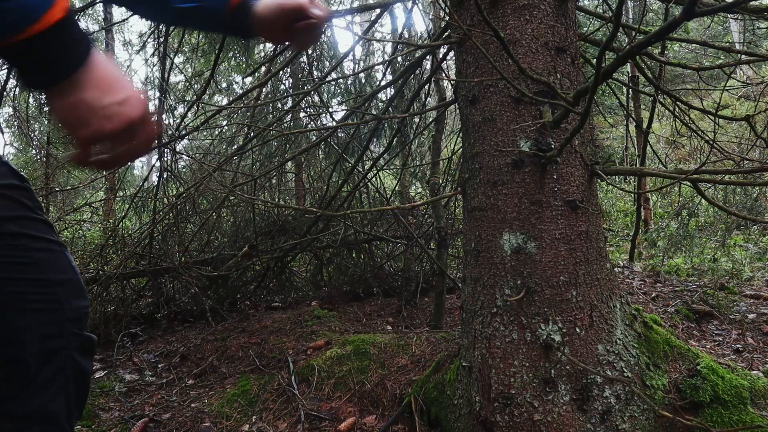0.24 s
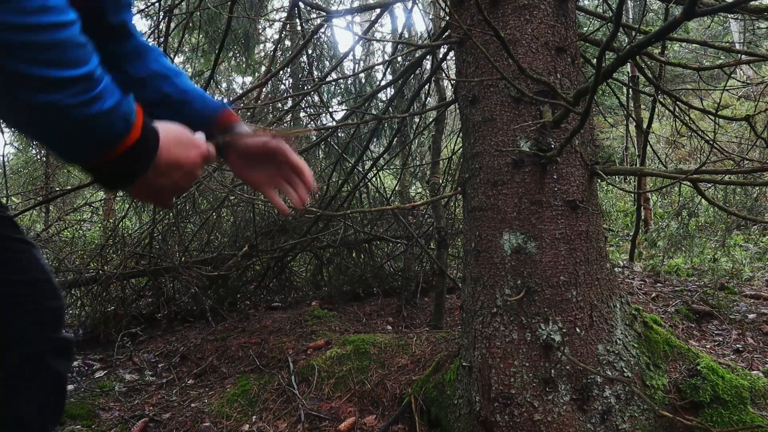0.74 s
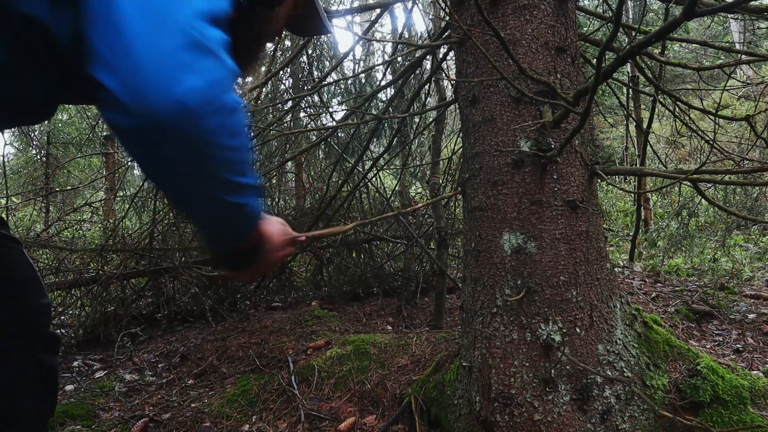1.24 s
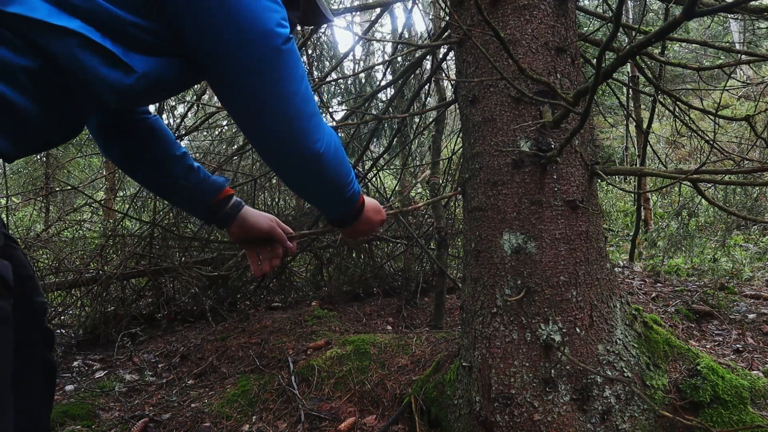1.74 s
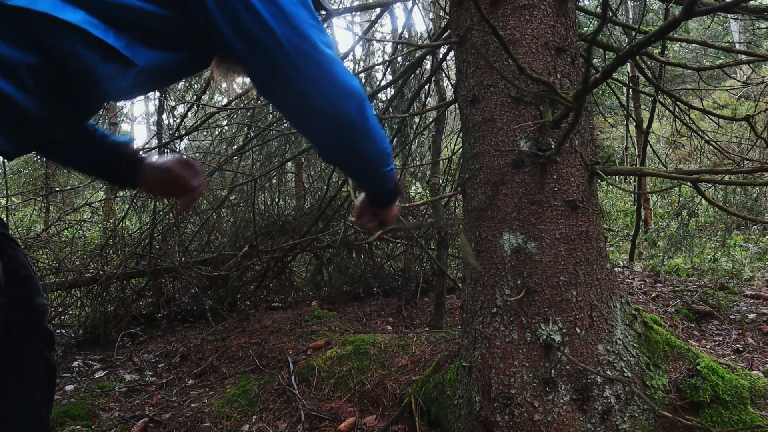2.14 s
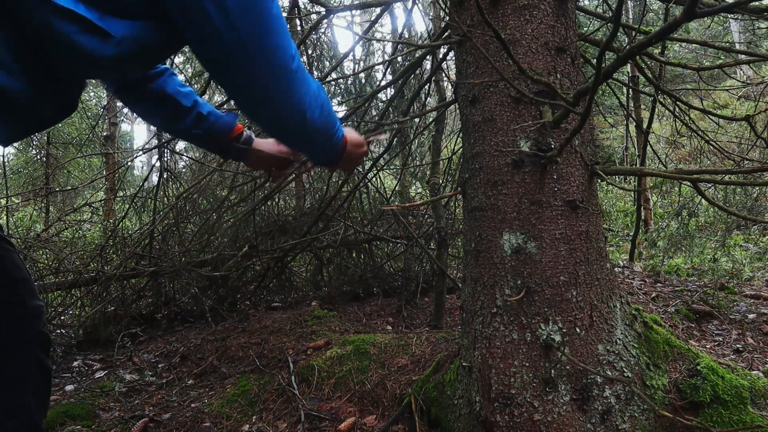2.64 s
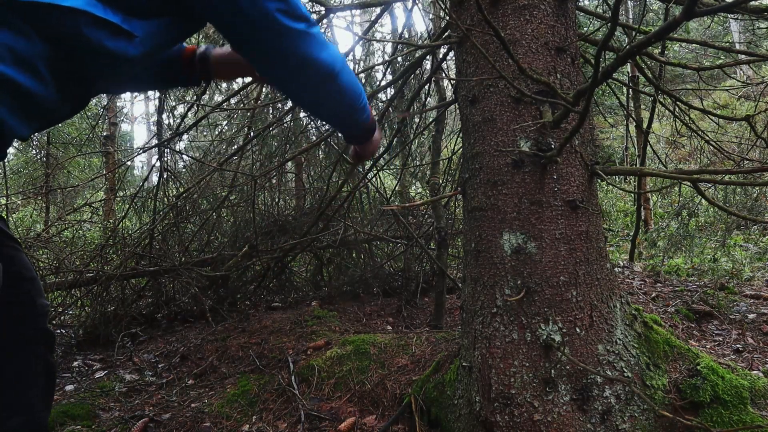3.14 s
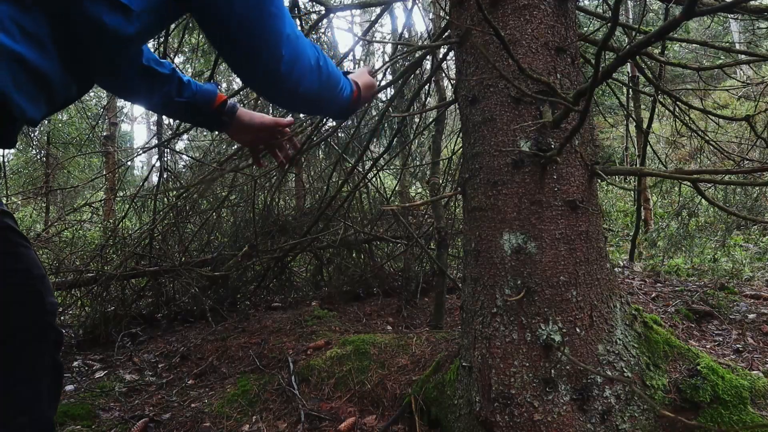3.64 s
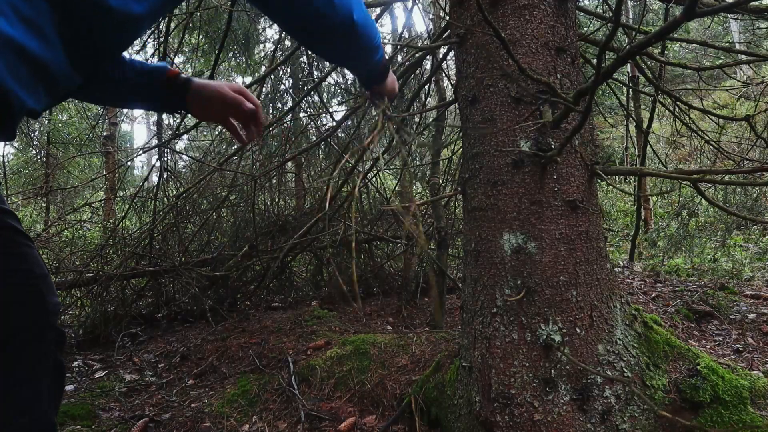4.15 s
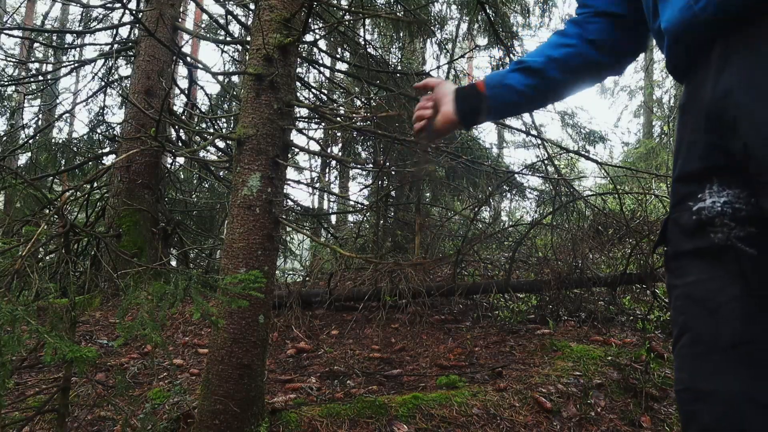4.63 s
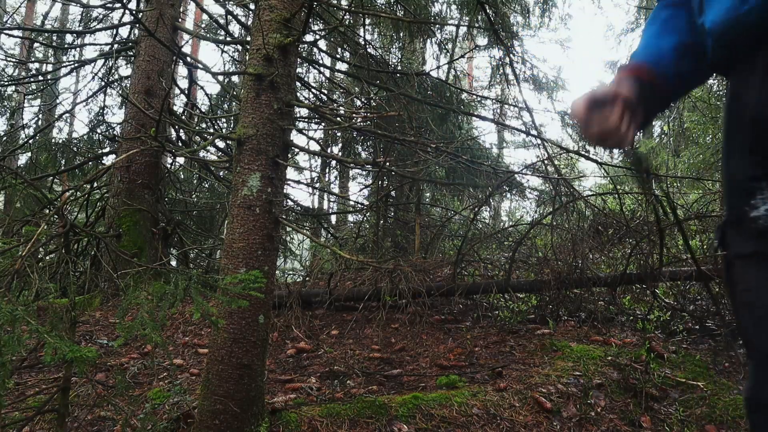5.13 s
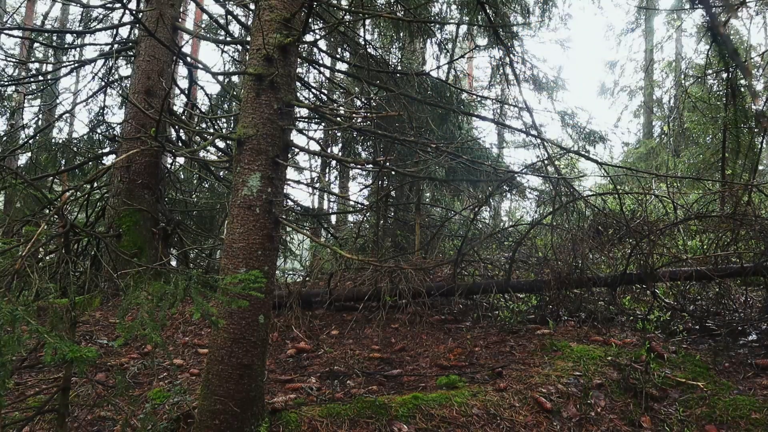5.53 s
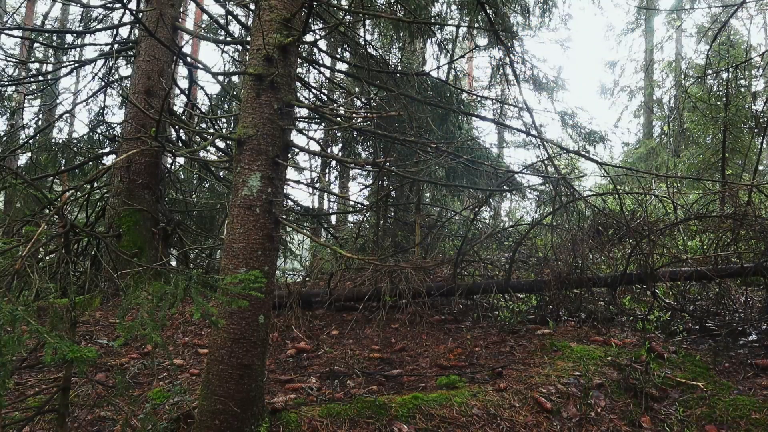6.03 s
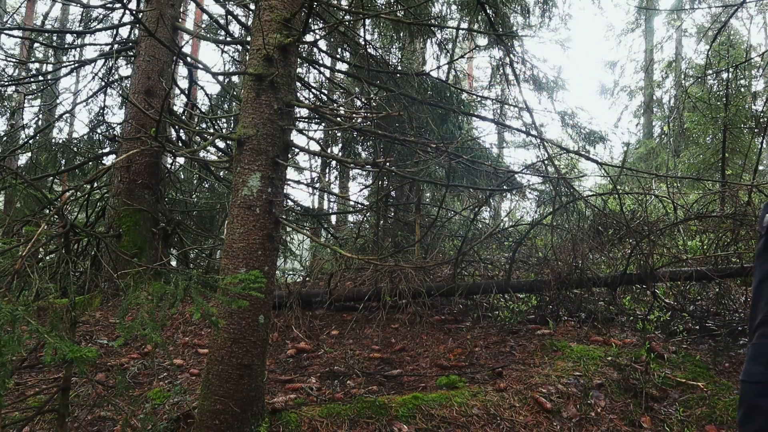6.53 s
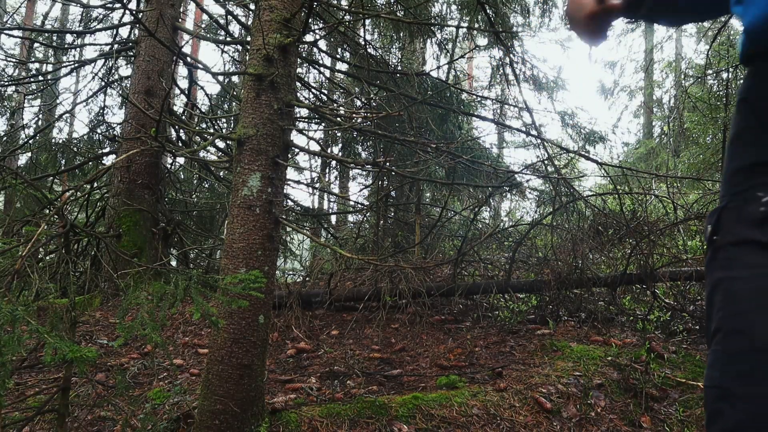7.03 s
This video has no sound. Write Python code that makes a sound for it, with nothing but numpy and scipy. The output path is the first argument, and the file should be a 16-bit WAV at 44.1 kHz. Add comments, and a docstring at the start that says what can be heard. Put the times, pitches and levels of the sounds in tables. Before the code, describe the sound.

A quiet forest with soft steady hush and low air rumble, heard by a close mono microphone. Immediately, at 0.04 s, a dry twig snaps brightly, then tiny ticks and light jacket rustle follow. At about 2.04 s two snaps land almost together, with small splinters after. From 2.35 to 4.3 s a songbird whistles short bending notes, faint, with fainter birds deeper among the trees. A hollow woody crack knocks at 3.2 s, a smaller snap at 4.0, and a strong, full break at 4.3. From 4.5 s the rustle thickens: cloth swishes near 5.0 to 5.5, and litter crunches in uneven strides. A duller crunch comes at 6.26, a heavy low thud with a crack at 6.63, more thuds around 6.85, then a very sharp, loud snap at 6.96. Rustle and small crackles continue to the end, about 7.3 s, with short echoes off trunks.

```python
"""A dry twig snaps at once in a quiet forest; more breaks follow, then steps over needle litter.
Breaks are bursts of fibre noise that ring the twig; small twigs crackle as filtered bursts, boots thud as
damped sines. Cloth swishes as resonant noise; jacket and litter rustle as coloured, grainy noise.
A songbird whistles bending sines, fainter birds sound deeper in the trees, over air rumble and hush.
Sparse decaying echoes scatter wood and birds between the trunks to a mono microphone."""
import sys
import numpy as np
from scipy import signal
from scipy.fft import rfft, irfft
from scipy.io import wavfile
from scipy.ndimage import uniform_filter1d

SR = 44100
rng = np.random.default_rng(int(sys.argv[2]) if len(sys.argv) > 2 else 0)


def digitize_waveform(pressure):
    """Quantize a signal to 16-bit integers and store it at the path in sys.argv[1].

    Rows of a 2-D input are taken as channels; values are limited to [-1, 1].
    """
    field = np.atleast_2d(pressure).T
    bounded = np.clip(field, -1, 1)
    quanta = np.round(bounded * 32767).astype(np.int16)
    wavfile.write(sys.argv[1], SR, quanta)


N = 321048

# breaking twigs: start_s, ring_hz, ring_gain_db, body_db, knock_db, crack_db, splinter_db
TWIG_BREAKS = [(0.044, 3930, 18, -41.5, -27.5, -19.5, -25.5), (2.0349, 1730, 17, -38.5, -21, -24, -26),
               (2.0436, 3530, 18, -32.5, -27, -18.5, -24.5), (2.108, 2850, 4, -48.5, -42.5, -42.5, -64),
               (2.1492, 3340, 4, -48.5, -43, -40, -43.5), (2.1863, 3330, 4.2, -45.5, -43.5, -42, -46.5),
               (3.199, 3070, 4.8, -44, -19.5, -20.5, -27.5), (3.3108, 2970, 2.7, -61, -40, -37.5, -40.5),
               (3.8663, 3940, 4.5, -73, -43.5, -34, -35), (4.012, 3520, 2.8, -48, -32.5, -24.5, -31.5),
               (4.286, 8200, 4, -45.5, -39, -36, -25), (4.3008, 2350, 10, -34, -16, -16, -18.5),
               (4.3079, 4930, 4, -32.5, -34, -28, -26), (4.5656, 2520, 4.9, -40.5, -34.5, -31.5, -34),
               (4.62, 1700, 2.7, -38, -33, -40.5, -48.5), (5.3456, 915, 8, -34.5, -33.5, -44.5, -66),
               (5.4456, 950, 5.9, -31, -31.5, -41, -53), (5.4712, 990, 2.1, -44, -30.5, -41, -50),
               (6.2584, 990, 1.4, -28, -19.5, -27, -26.5), (6.4312, 1760, 2.9, -36, -32, -42, -46),
               (6.626, 6450, 3.3, -31, -42, -39.5, -36.5), (6.6479, 3420, 13, -38, -25, -26, -23.5),
               (6.746, 4550, 4, -39, -35.5, -38, -36), (6.824, 980, 11, -31, -27, -35.5, -46),
               (6.937, 6450, 2.5, -56, -54, -43.5, -41.5), (6.9566, 3020, 1.4, -42, -25.5, -14.5, -15),
               (6.9697, 3900, 4, -43, -35, -26.5, -25.5)]
# bands of body, knock, crack and splinter: low_hz, high_hz
BREAK_BANDS = [(300, 900), (900, 2500), (2500, 6000), (6000, 10500)]
# clearest small twigs: start_s, level_db, centre_hz, spread (scaled to octaves in crackle)
SMALL_TWIGS = [(0.008, -39, 2780, .8), (0.013, -36.5, 3320, 0.86), (0.093, -47, 4730, 1.2),
               (0.256, -52.5, 2670, 1.7), (0.479, -44, 760, 0.7), (0.757, -57, 1230, 1.2),
               (0.913, -49, 845, 0.39), (0.985, -46, 930, 0.34), (1.114, -51, 1150, 0.28),
               (1.248, -57, 2520, 1.2), (1.32, -51, 1390, 1.5), (1.348, -44, 1290, 0.31),
               (1.465, -42.5, 1040, 0.43), (1.513, -50.5, 4560, 0.48), (1.682, -46.5, 1220, 0.82),
               (1.758, -53, 2120, 0.45), (1.778, -54, 1950, 0.47), (1.956, -50, 2560, 1.2),
               (2.514, -50.5, 2170, 0.35), (2.602, -47, 1920, 0.39), (2.653, -49, 2600, 0.19),
               (2.824, -46.5, 3300, 0.42), (2.952, -52, 2430, 0.86), (3.163, -55.5, 3940, 1.3),
               (3.291, -42, 2650, 0.91), (3.34, -41, 3060, 0.9), (3.475, -50, 2840, 1.34),
               (3.611, -48, 3660, 1.6), (3.659, -53, 6440, 0.59), (3.816, -52.5, 2260, 1.3),
               (4.08, -47.5, 3400, 1.1), (4.401, -41, 880, 1.7), (4.473, -44.5, 3460, 0.87),
               (4.656, -41.5, 1370, 1.9), (4.682, -38, 940, 0.27), (5.007, -43, 955, 0.22),
               (5.134, -47, 1410, 0.53), (5.621, -43.5, 1340, 2.3), (5.776, -48.5, 1880, 0.92),
               (6.02, -40, 684, 0.74), (6.186, -42, 1090, 0.92), (6.436, -33.5, 845, 0.54),
               (6.565, -41.5, 2400, 1.6), (6.832, -34.5, 1530, 1.2), (6.849, -37, 1170, 1.8),
               (6.88, -39, 990, 0.42), (7.059, -41, 2400, 0.55), (7.118, -39.5, 2920, 0.86)]
# boots on soft ground and thick, sprung wood: start_s, level_db, mode_hz, t60_s
BLUNT_KNOCKS = [(0.045, -40.5, 230, 0.058), (0.044, -24.5, 767, 0.022), (2.045, -51, 109, 0.27),
                (2.758, -40.5, 890, 0.023), (3.198, -26, 292, 0.022), (3.198, -16, 1002, 0.034),
                (3.2, -20.5, 1290, 0.033), (3.2, -22, 500, 0.032), (3.201, -38, 79.4, 0.05),
                (3.249, -54.5, 103.7, 0.85), (3.435, -47.5, 850, 0.072), (4.301, -45.5, 174, 0.12),
                (4.402, -25, 560, 0.013), (4.568, -46, 121, 0.22), (6.019, -26, 480, 0.027),
                (6.07, -44, 460, 0.076), (6.261, -41, 322, 0.038), (6.628, -16, 138.5, 0.083),
                (6.631, -19.5, 228, 0.064), (6.83, -33, 440, 0.05), (6.843, -30, 287, 0.047),
                (6.85, -26, 175, 0.097), (6.879, -37.5, 134.5, 0.22)]
# cloth sliding on cloth: start_s, length_s, start_hz, end_hz, resonance_width_hz, buzz_db
CLOTH_SLIDES = [(4.926, 0.037, 1630, 1100, 790, -39.5), (5.031, 0.061, 2280, 3040, 1200, -44.5),
                (5.088, 0.029, 1800, 1400, 606, -48.5), (5.276, 0.064, 3000, 3000, 400, -47.5),
                (5.474, 0.035, 7760, 2480, 900, -42), (5.484, 0.041, 1900, 700, 300, -40),
                (5.816, 0.065, 840, 1200, 250, -52), (5.861, 0.067, 1890, 1900, 600, -51.5),
                (5.923, 0.054, 1770, 2900, 110, -49.5), (5.962, 0.015, 2780, 2350, 250, -46),
                (6.459, 0.027, 9500, 7000, 1500, -53)]
# arm reaches, later strides through litter: start_s, length_s, body_db, rub_db, fizz_db
BODY_MOVES = [(0, 0.15, -63, -59, -72), (0.322, 0.25, -59, -64, -66.5), (0.54, 0.49, -65, -71, -74.5),
              (1.208, .35, -60, -59.5, -65), (1.604, 0.087, -66, -68, -79), (1.943, 0.25, -64, -68, -78),
              (2.358, 0.55, -69.5, -65.5, -79), (3.24, 0.069, -55.5, -57.5, -63),
              (3.42, 0.19, -81, -69, -77), (4.295, 0.094, -55.5, -64, -66), (4.486, 0.19, -54, -56, -62.5),
              (4.707, 0.15, -56, -55.5, -70), (4.879, 0.069, -51, -52, -70), (4.968, 0.16, -55.5, -55, -84),
              (5.206, 0.21, -48.5, -47.5, -58), (5.336, 0.086, -52, -50.5, -69),
              (5.421, .12, -47, -48.5, -65), (5.636, .15, -53.5, -58.5, -66.5), (5.8, 0.2, -55, -54, -64.5),
              (5.996, 0.093, -53, -60.5, -64.5), (6.093, 0.14, -48, -55, -66),
              (6.247, 0.05, -39.5, -44, -58), (6.322, 0.13, -48, -46, -53.5), (6.524, 0.038, -70, -62, -62),
              (6.726, 0.057, -47.5, -53.5, -63), (6.805, 0.058, -44, -48, -59), (6.943, .14, -46, -53, -75),
              (7.092, 0.17, -51, -51.5, -65)]
# brushing through fine dead twigs: start_s, length_s, loudest_tick_db
TWIG_BRUSHES = [(0.218, 0.097, -59), (1.231, 0.34, -58), (1.695, 0.072, -66), (2.452, 0.44, -62),
                (3.245, .13, -52), (3.45, .42, -62), (5.33, 0.11, -51), (6.27, .32, -50.5)]
# spectra of the three rustle parts: freq_hz, relative_db_per_hz
BODY_COLOUR = [(40, -11.5), (130, -12.5), (260, -5), (500, 2.5), (800, 2.5), (1100, -12), (1600, -36.5),
               (4000, -42.5)]
RUB_COLOUR = [(500, -33.5), (950, 1), (1250, 1.5), (1600, 0.5), (2400, -6.5), (3100, -6.5), (3700, -11),
              (5000, -18), (8000, -31.5)]
FIZZ_COLOUR = [(2000, -17.5), (3800, 0.5), (5900, 3.5), (7400, -2.5), (8700, 0.5), (10000, -18),
               (13000, -6), (16000, -36)]
# songbird syllables: start_s, length_s, start_hz, middle_hz, end_hz, level_db
SONG_SYLLABLES = [(2.354, 0.037, 2620, 2810, 3100, -60), (2.39, 0.096, 3900, 3560, 3260, -63),
                  (2.675, 0.02, 3440, 4080, 5030, -60), (2.692, 0.038, 5200, 4650, 4350, -62),
                  (2.718, 0.043, 4260, 4050, 4300, -52.5), (2.8, 0.077, 3120, 3110, 2890, -48),
                  (2.873, 0.044, 3060, 2760, 2780, -51), (2.964, 0.029, 2920, 3300, 3320, -59),
                  (2.985, 0.051, 3410, 3160, 3070, -53), (3.08, 0.036, 5030, 3850, 3480, -57.5),
                  (3.176, 0.07, 3290, 3330, 3170, -54.5), (3.415, 0.049, 2270, 2560, 2450, -56),
                  (3.495, 0.0477, 2740, 3030, 3150, -50), (3.535, 0.063, 3240, 2770, 2520, -53),
                  (3.675, 0.031, 5170, 4140, 3450, -58), (3.785, 0.036, 4030, 3860, 3680, -58),
                  (3.817, 0.11, 3500, 3047, 2950, -51), (3.963, 0.063, 2590, 2755, 3120, -53.5),
                  (4.271, 0.022, 4100, 4000, 3840, -57)]
# thin whistles deep in the trees: start_s, length_s, start_hz, middle_hz, end_hz, level_db
FAR_SYLLABLES = [(.72, 0.029, 3470, 4120, 4200, -69.5), (1.065, 0.037, 3340, 3800, 4260, -71.5),
                 (2.22, .09, 4260, 4000, 3900, -76), (2.44, 0.084, 3650, 3620, 3600, -71),
                 (2.58, 0.033, 4480, 4620, 4600, -70), (3.22, 0.1, 3460, 3540, 3530, -63),
                 (4.04, 0.2, 3420, 3480, 3470, -71), (4.19, 0.025, 5830, 6250, 6150, -70),
                 (5.84, 0.047, 6400, 5920, 5500, -70)]
# air pushed at the microphone by the body: start_s, length_s, level_db
AIR_PUFFS = [(0, 1.33, -72), (1.5, 0.29, -65), (2.04, 0.089, -60), (4.3, 0.54, -58.5), (5.3, 0.07, -48.5),
             (5.42, 0.51, -64), (6.55, 0.4, -57)]
# spectrum of moving air: freq_hz, relative_db_per_hz
AIR_COLOUR = [(10, 1), (28, -4), (48, 3.5), (70, -12), (120, -6), (250, -25.5), (800, -68.5)]
# spectrum of the steady forest hush: freq_hz, relative_db_per_hz
HUSH_COLOUR = [(40, -2.5), (110, -4), (250, 0.5), (600, 1), (1000, 1), (1600, -3.5), (3000, -4.5),
               (5500, -10.5), (8000, -14), (11000, -17), (16000, -13.5)]
# decay of scatter from far trunks: freq_hz, t60_s
TRUNK_DECAY = [(150, .5), (700, 0.76), (2000, 0.28), (4000, 0.52), (8000, 0.49), (15000, 0.28)]
# microphone response, dull in the top octave: freq_hz, gain_db
MICROPHONE_RESPONSE = [(20, 0.5), (6000, -1), (9000, 0.5), (12000, -0.5), (14000, -3), (16000, -5.5)]

EDGE_HZ = 16650  # upper band limit
CLICK_S = .006  # reference length for click energy
LEAD_S = .001  # first fibres before the burst
# break: hard burst, then weaker shiver
BURST_S, SHIVER_DB, SHIVER_S = .0009, -10, .0042
RING_WIDTH_HZ = 480
# splinters: level re crack, longest lag, level change over that lag, centre
SPLINTER_DB, SPLINTER_S, SPLINTER_FADE_DB, SPLINTER_HZ = -22, 0.11, -18.5, 2500
# move: share of its length spent rising, t60 after its end
MOVE_RISE_SHARE, MOVE_T60_S = 0.52, 0.39
DRAUGHT_DB, DRAUGHT_WAVER_DB, DRAUGHT_PER_S = -73, 4.5, 11
# brush ticks: scatter reaches twice its value down, none up; octaves are each way
TICK_GAP_S, TICK_SCATTER_DB, TICK_HZ, TICK_OCTAVES = .024, 0.5, 4300, 0.88
# litter cracks: level re rub; scatter reaches half its value up, one and a half times down;
# octaves are each way
CATCH_DB, CATCH_SCATTER_DB, CATCH_HZ, CATCH_OCTAVES = 1, 6, 1400, 0.99


def amp(db):
    """Decibels to gain."""
    return 10 ** (np.asarray(db) / 20)


def evened(x):
    """Scales to rms 1."""
    return x / np.sqrt(np.mean(x ** 2) + 1e-20)


def as_click(x):
    """Scales a click to the energy of rms 1 held for CLICK_S."""
    return x * np.sqrt(CLICK_S * SR / (np.sum(x ** 2) + 1e-20))


def read(points, hz):
    """Reads a table on a log-frequency axis."""
    point_hz, value = np.transpose(points)
    return np.interp(np.log(hz + 1), np.log(point_hz + 1), value)


def add(mix, start_s, sound):
    """Mixes a sound in at a time, cut at the end of the mix."""
    part = mix[max(round(start_s * SR), 0):][:len(sound)]
    part += sound[:len(part)]


def shape(x, points):
    """Applies a gain-in-dB curve to a full-length sound."""
    gain = amp(read(points, np.fft.rfftfreq(N, 1 / SR)))
    return irfft(rfft(x) * gain, N)


def colour(x, points):
    """Gives a full-length sound a spectrum, at rms 1."""
    return evened(shape(x, points))


def band(x, lo_hz, hi_hz, order=2):
    """Causal band-pass, edges held within a safe range."""
    edges = np.clip([lo_hz, hi_hz], [10, 20], [SR * .4, SR * .45])
    return signal.sosfilt(signal.butter(order, edges, "band", fs=SR, output="sos"), x)


def resonate(x, hz, width_hz):
    """Resonance of gain 1 that can follow a pitch curve: shift to 0 Hz, smooth, shift back."""
    turn = np.exp(2j * np.pi * np.cumsum(hz * np.ones(len(x))) / SR)
    pole = np.exp(-np.pi * width_hz / SR)
    smooth = signal.lfilter([1 - pole], [1, -pole], x / turn)
    return 2 * (turn * smooth).real


def wander(size, per_s):
    """Random values of about unit size, joined by straight lines."""
    at = np.arange(size) * per_s / SR
    return np.interp(at, np.arange(4096), rng.standard_normal(4096))


def fracture(burst_s, after_db, after_s, lead_db=-14, size=2048):
    """First fibres give way, the rest part in one burst, then the two ends shiver and splinter."""
    t = np.arange(size) / SR - LEAD_S
    fibres = rng.standard_normal(size)
    fibres = np.sign(fibres) * np.sqrt(abs(fibres))
    lead = amp(lead_db) * (1 + t / LEAD_S)
    burst = np.exp(-abs(t) / burst_s) + amp(after_db) * np.exp(-abs(t) / after_s)
    return fibres * np.where(t < 0, lead, burst)


def snaps(top_db=-7):
    """Each break rings its twig for a few milliseconds; the finest splinters reach the top octave."""
    out = np.zeros(N)
    for start_s, ring_hz, ring_db, *levels_db in TWIG_BREAKS:
        tear = fracture(BURST_S, SHIVER_DB, SHIVER_S)
        tear = tear + amp(ring_db) * resonate(tear, ring_hz, RING_WIDTH_HZ)
        top = as_click(band(tear, 10130, 14300))
        sound = amp(levels_db[-1] + top_db) * top
        for db, edges in zip(levels_db, BREAK_BANDS):
            sound = sound + amp(db) * as_click(band(tear, *edges, order=3))
        add(out, start_s - LEAD_S, sound)
    return out


def crackle(hz, spread, reach=1.58):
    """One small twig gives way or flicks against another."""
    tear = fracture(burst_s=.0014, after_db=-7, after_s=.0055, lead_db=-12)
    ratio = 2 ** (reach * max(spread, .2))  # octaves each side
    # lower centre: duller, as from a bigger piece
    tear = signal.lfilter([1], [1, -np.exp(-2 * np.pi * hz / SR)], tear)
    tear = band(tear, hz / ratio, hz * ratio, order=1)
    return as_click(band(tear, 366, 13300))


def splinters(count=3):
    """The last fibres let go one by one after each break, weaker the later they part."""
    out = np.zeros(N)
    lags = rng.random((len(TWIG_BREAKS), count))
    for (start_s, *_, crack_db, _), break_lags in zip(TWIG_BREAKS, lags):
        for lag in break_lags:
            gain = amp(crack_db + SPLINTER_DB + lag * SPLINTER_FADE_DB)
            add(out, start_s + lag * SPLINTER_S, gain * crackle(SPLINTER_HZ, spread=4.2))
    return out


def crackles():
    """Small twigs that stand out from the rustle, each a filtered fibre burst."""
    out = np.zeros(N)
    for start_s, db, hz, spread in SMALL_TWIGS:
        add(out, start_s, amp(db) * crackle(hz, spread))
    return out


def brushes(count=24):
    """Fine twigs flick off the sleeves and boots one after another."""
    out = np.zeros(N)
    for start_s, length_s, db in TWIG_BRUSHES:
        for k, (when, size, pitch) in enumerate(rng.random((count, 3))):
            lag_s = (k + when) * TICK_GAP_S
            tick = crackle(TICK_HZ * 2 ** (TICK_OCTAVES * (2 * pitch - 1)), spread=0.62)
            if lag_s < length_s:
                add(out, start_s + lag_s, amp(db + TICK_SCATTER_DB * (2 * size - 2)) * tick)
    return out


def thuds(rise_s=0.0006, grit_db=-13):
    """Heavily damped low modes, roughened by crushed litter."""
    out, t = np.zeros(N), np.arange(SR // 2) / SR
    for start_s, db, hz, t60_s in BLUNT_KNOCKS:
        grit = evened(band(rng.standard_normal(len(t)), hz / 2, hz * 2))
        swing = -np.sin(2 * np.pi * hz * t) + amp(grit_db) * grit
        decay = amp(db - 60 * t / t60_s)
        add(out, start_s, swing * decay * (1 - np.exp(-t / rise_s)))
    return out


def strokes(rows):
    """Level over time of moves that rise, hold and die away; overlaps add in power."""
    power = np.zeros(N)
    for start_s, length_s, db in rows:
        t = np.arange(int((length_s + MOVE_T60_S) * SR)) / SR
        rise = np.sin(np.pi / 2 * np.minimum(t / (MOVE_RISE_SHARE * length_s), 1))
        decay = amp(db - 60 * np.maximum(t - length_s, 0) / MOVE_T60_S)
        add(power, start_s, (rise * decay) ** 2)
    return np.sqrt(power)


def move_levels():
    """Levels over time of the body, rub and fizz of all moves."""
    start_s, length_s, *columns_db = np.transpose(BODY_MOVES)
    return [strokes(zip(start_s, length_s, db)) for db in columns_db]


def catches(count=240):
    """Bits of litter of all sizes crack at random, following the level of the move that stirs them."""
    out, rub = np.zeros(N), move_levels()[1]
    for k, (when, size, pitch) in enumerate(rng.random((count, 3))):
        at = int((k + when) * N / count)
        gain = rub[at] * amp(CATCH_DB + CATCH_SCATTER_DB * (2 * size - 1.5))
        hz = CATCH_HZ * 2 ** (CATCH_OCTAVES * (2 * pitch - 1))
        add(out, at / SR, gain * crackle(hz, spread=.6))
    return out


def friction(grains_per_s, size_db, grain_share):
    """A smooth rub with countless tiny catches of needles and cloth."""
    grain_gain = amp(size_db * np.minimum(rng.exponential(1, N), 2))
    grains = np.sign(rng.standard_normal(N)) * grain_gain
    grains = grains * (rng.random(N) < grains_per_s / SR)
    smooth = rng.standard_normal(N)
    return np.sqrt(grain_share) * evened(grains) + np.sqrt(1 - grain_share) * smooth


def patchy(x, depth_db):
    """Folds and leaves favour ever-changing pitches, in patches of about 300 Hz by 25 ms."""
    z = signal.stft(x, nperseg=512, noverlap=384)[2]
    patches = uniform_filter1d(rng.standard_normal(z.shape), size=4, axis=0)
    patches = evened(uniform_filter1d(patches, size=8, axis=1))
    return evened(signal.istft(z * amp(depth_db * patches), nperseg=512, noverlap=384)[1][:N])


def rustle(fizz_gain_db=1, flicker_db=2.0):
    """Jacket and forest litter rub with each move; the level flickers."""
    body, rub, fizz = move_levels()
    # one catch sounds in both lower parts
    litter = patchy(friction(grains_per_s=350, size_db=3, grain_share=0.38), depth_db=2.5)
    fine = friction(grains_per_s=900, size_db=3, grain_share=.3)
    out = body * colour(litter, BODY_COLOUR) + rub * colour(litter, RUB_COLOUR)
    out += amp(fizz_gain_db) * fizz * colour(fine, FIZZ_COLOUR)
    return out * amp(flicker_db * wander(N, 60))


def swishes():
    """Ribs of woven cloth buzz at a pitch that follows the sliding speed, inside a broader hiss."""
    out = np.zeros(N)
    for start_s, length_s, start_hz, end_hz, width_hz, db in CLOTH_SLIDES:
        size = int(length_s * SR)
        hz = np.geomspace(start_hz, end_hz, size)
        ribs, fuzz = rng.standard_normal((2, size))
        buzz = evened(resonate(resonate(ribs, hz, width_hz), hz, width_hz))
        hiss = 0.25 * evened(band(fuzz, hz.mean() / 2, hz.mean() * 2))
        add(out, start_s, amp(db) * (buzz + hiss) * signal.windows.tukey(size, .7))
    return out


def bird(syllables, waver=0.0063, flutter_db=3.5):
    """Nearly pure whistles, each bending through three pitches."""
    out = np.zeros(N)
    for start_s, length_s, *pitches_hz, db in syllables:
        size = int(length_s * SR)
        bend = np.polyfit([0, .5, 1], pitches_hz, 2)
        hz = np.polyval(bend, np.linspace(0, 1, size))
        hz = hz * (1 + waver * wander(size, 267))
        whistle = np.sqrt(2) * np.sin(2 * np.pi * np.cumsum(hz) / SR)
        level = amp(db + flutter_db * wander(size, 100))
        add(out, start_s, whistle * level * signal.windows.tukey(size, .4))
    return out


def forest(x, near_db, far_db, near_t60_s=0.083, delay_s=.006):
    """Quick scatter from the ground and near branches, then a faint tail from far trunks."""
    taps = rng.standard_normal((2, SR)) * (rng.random((2, SR)) < 3000 / SR)  # 3000 echoes per s
    hz, t, z = signal.stft(taps[0], SR, nperseg=256)
    decay = amp(-60 * t / read(TRUNK_DECAY, hz)[:, None])
    far = signal.istft(z * decay, SR, nperseg=256)[1][:SR]
    near = taps[1] * amp(-60 * np.arange(SR) / SR / near_t60_s)
    echo = amp(near_db) * near / np.linalg.norm(near) + amp(far_db) * far / np.linalg.norm(far)
    out = np.zeros(N)
    add(out, delay_s, signal.fftconvolve(x, band(echo, 67, 16000, order=1)))
    return out


def rumble():
    """Air drifts past the microphone, in puffs when the body swings by."""
    draught = amp(DRAUGHT_DB + DRAUGHT_WAVER_DB * wander(N, DRAUGHT_PER_S))
    level = np.hypot(draught, strokes(AIR_PUFFS))
    return level * colour(rng.standard_normal(N), AIR_COLOUR)


def hush(level_db=-63.5):
    """Far foliage and the microphone's own hiss, as steady coloured noise."""
    return amp(level_db) * colour(rng.standard_normal(N), HUSH_COLOUR)


def scene():
    """Wood, cloth and birds in the forest, the same in both channels."""
    wood = snaps() + splinters() + crackles() + brushes() + thuds() + catches()
    song = bird(SONG_SYLLABLES)
    far_song = bird(FAR_SYLLABLES, waver=0.021)
    mid = wood + forest(wood, near_db=-18.0, far_db=-26.5)
    mid += rustle() + swishes()
    mid += song + forest(song, near_db=-14, far_db=-10.5)
    mid += forest(far_song, near_db=2.5, far_db=0.5)  # scatter only, no direct path
    mid += rumble() + hush()
    return np.array([mid, mid])


def record(dry):
    """The microphone's colour, a soft ceiling on the hardest cracks, then the band limit."""
    heard = shape(dry, MICROPHONE_RESPONSE)
    heard = heard / (1 + (heard / .88) ** 8) ** (1 / 8)
    low_pass = signal.firwin(255, EDGE_HZ, window=("kaiser", 8), fs=SR)
    return signal.oaconvolve(heard, low_pass[None], "same")


dry = scene()
out = record(dry)
digitize_waveform(out)
```